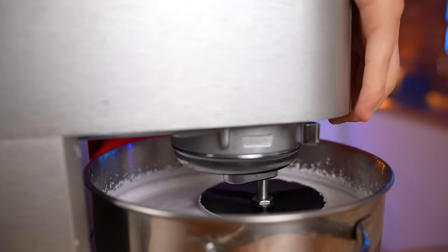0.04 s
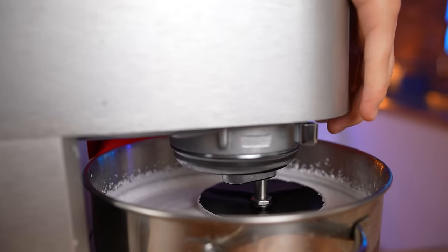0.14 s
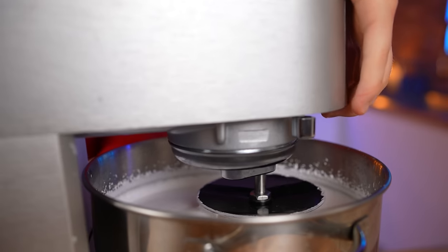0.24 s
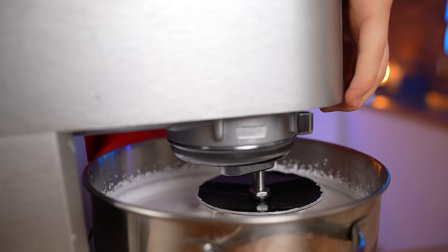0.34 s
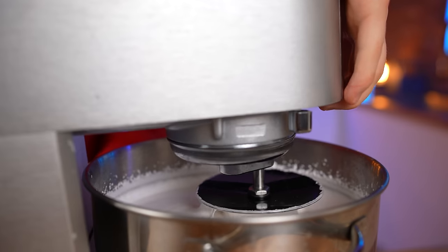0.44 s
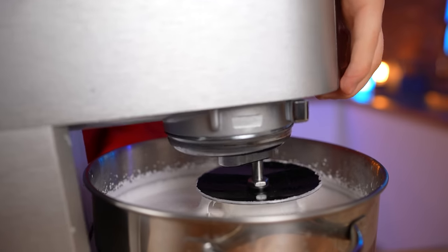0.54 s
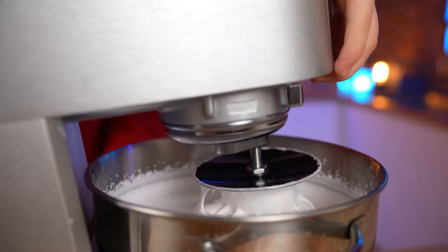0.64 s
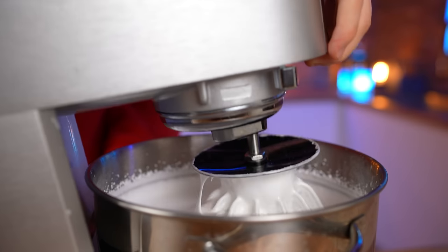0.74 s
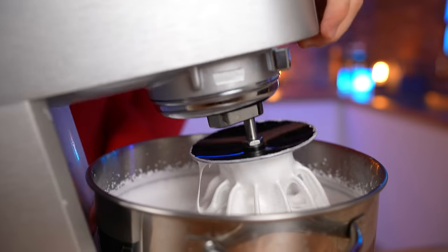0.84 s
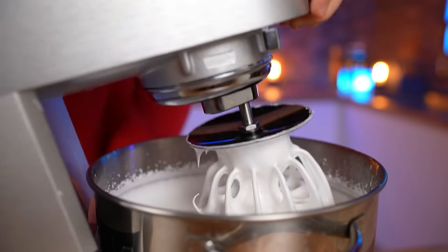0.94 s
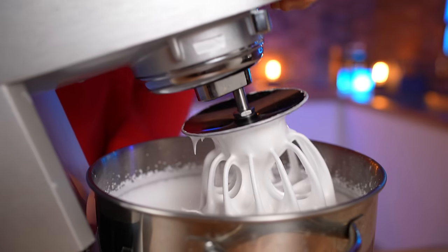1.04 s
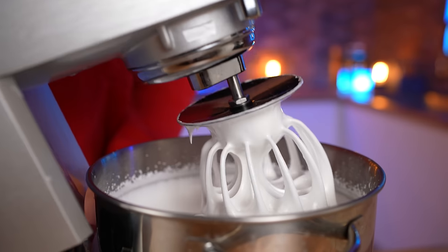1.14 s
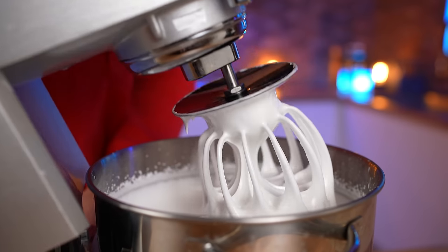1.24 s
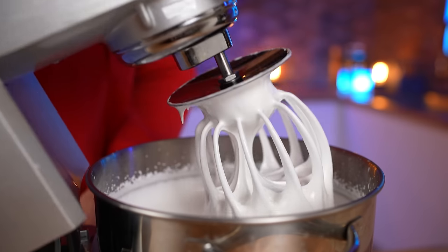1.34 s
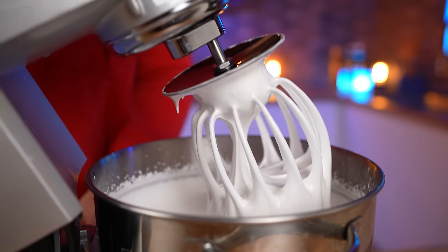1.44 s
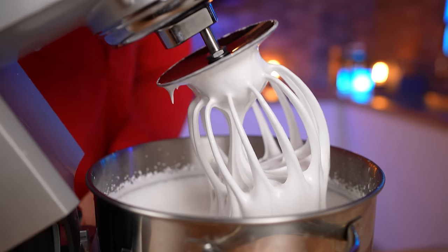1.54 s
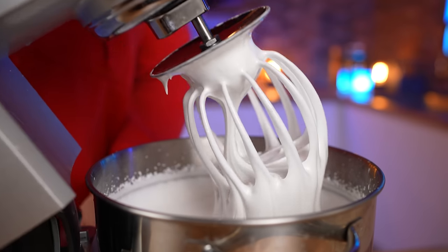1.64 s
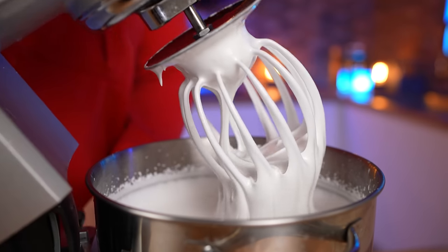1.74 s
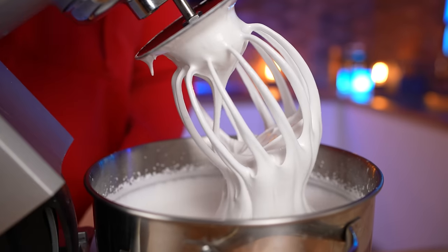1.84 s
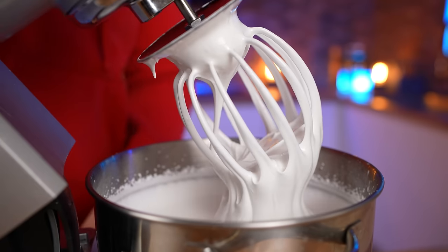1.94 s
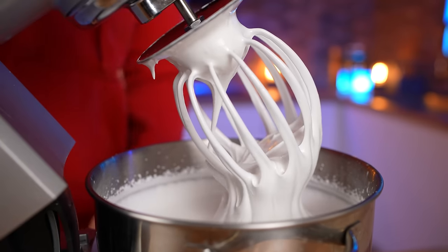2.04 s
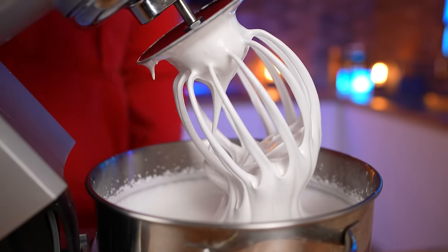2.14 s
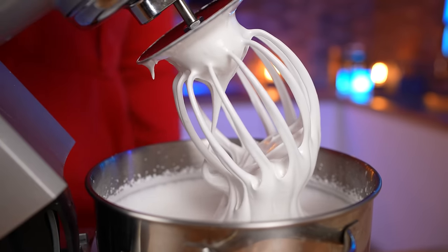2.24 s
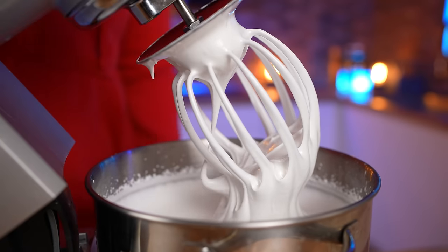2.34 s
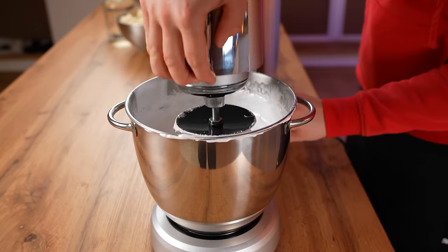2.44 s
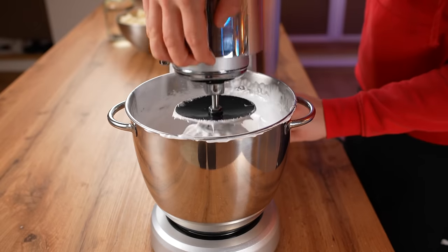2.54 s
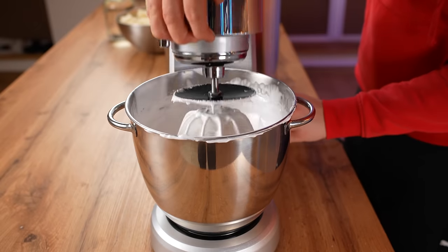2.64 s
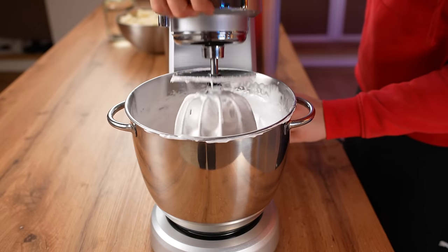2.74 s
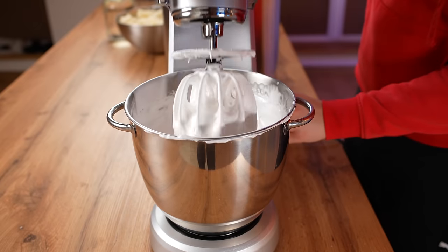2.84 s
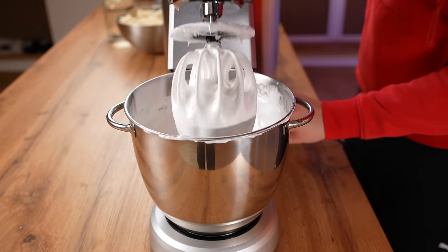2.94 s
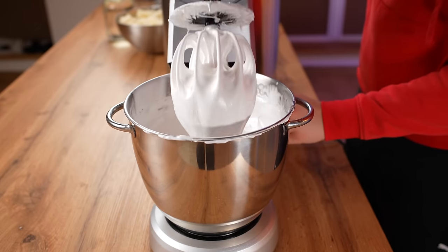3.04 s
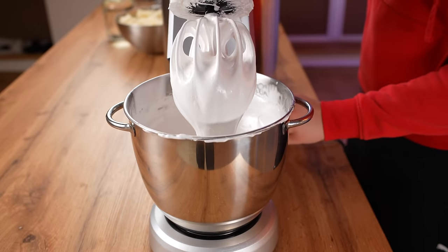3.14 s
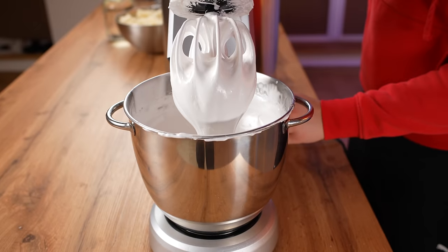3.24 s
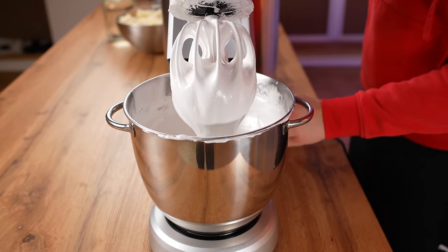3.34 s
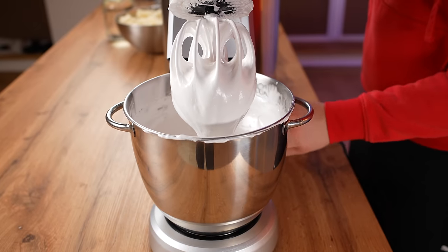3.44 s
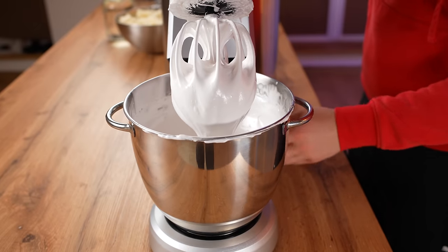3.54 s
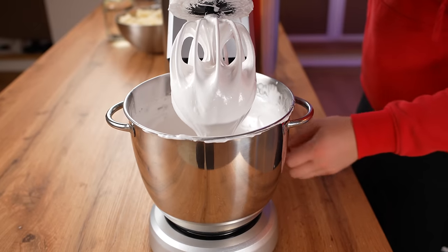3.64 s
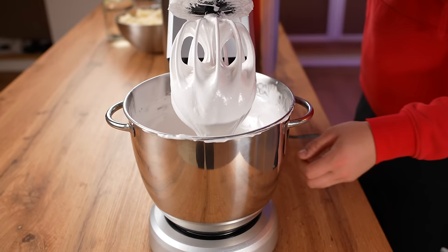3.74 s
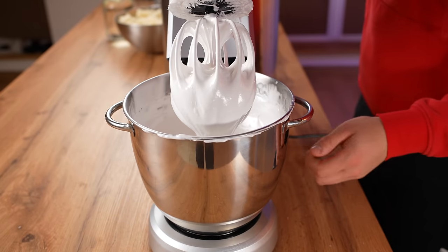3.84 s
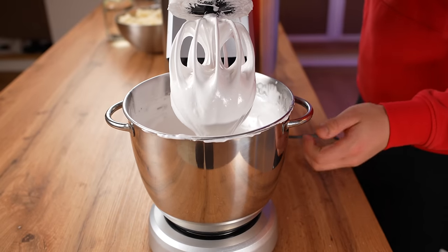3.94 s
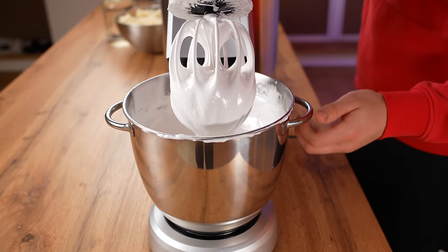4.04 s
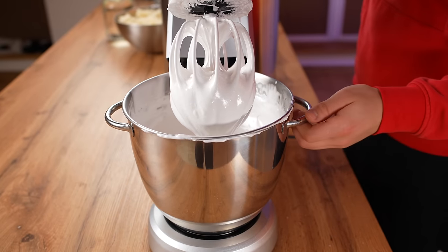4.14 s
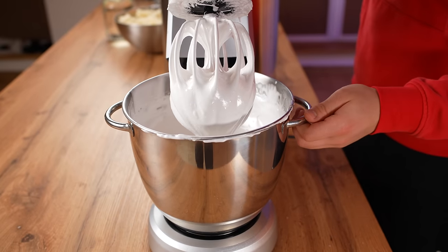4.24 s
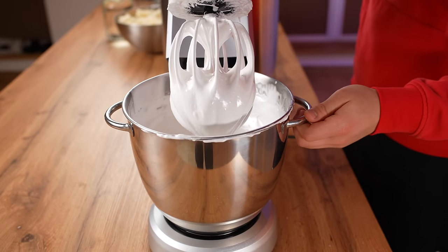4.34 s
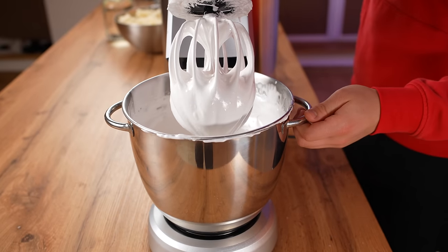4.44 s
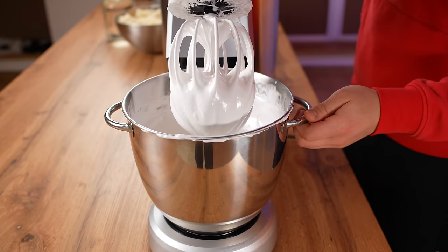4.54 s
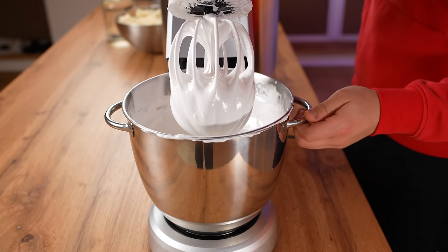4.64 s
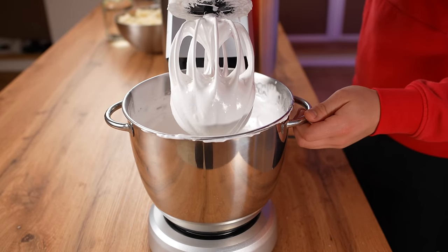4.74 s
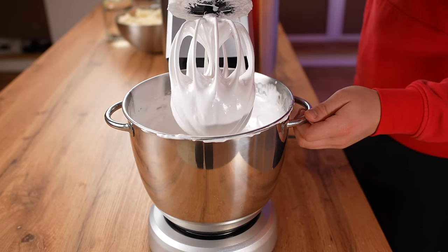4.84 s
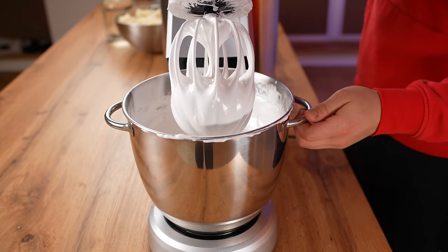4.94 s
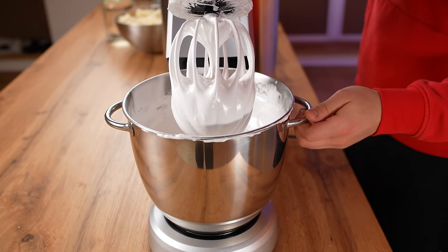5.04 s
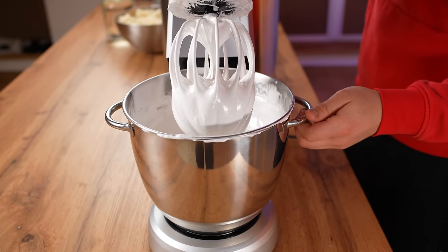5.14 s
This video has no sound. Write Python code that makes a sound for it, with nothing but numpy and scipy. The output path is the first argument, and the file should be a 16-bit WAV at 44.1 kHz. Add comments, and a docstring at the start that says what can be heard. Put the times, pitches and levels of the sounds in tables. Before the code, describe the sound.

Two lifts of a switched-off stand mixer head. The first is close-miked and leans left: bright latch snap, smooth hinge rub, sparse ticks, loud clack at the stop. The second is centred and roomier, with more background air: duller unlatching, uneven scraping with short squeaks, clustered heavy metal knocks, then a deep thud through the wooden counter and a fading room tail.

```python
"""In a kitchen, a stand mixer is handled on a wooden counter with its motor off. At the near place, left of
centre, the latch snaps and the head tilts up on a rubbing, ticking hinge and clacks against its stop. Then,
farther off and centred, the latch snaps again, the head scrapes down and clatters into its lock, and the
machine rocks on its feet with its steel bowl. Bursts of noise ring metal bodies for the contacts, dense tiny
slips make the rubs, wavering tones the judder and squeaks, and decaying noise the room."""
import sys
import numpy as np
from scipy import signal
from scipy.fft import rfft, irfft
from scipy.io import wavfile
from scipy.ndimage import uniform_filter1d

SR = 44100
rng = np.random.default_rng(int(sys.argv[2]) if len(sys.argv) > 2 else 0)


def transcribe(u):
    """Save the signal u as a 16-bit wav file named by the first command-line argument.

    u: samples, shape (n,) or (channels, n), limited to [-1, 1]; the rate is SR.
    q: integer samples, one column per channel.
    """
    v = np.clip(np.atleast_2d(u).T, -1, 1)
    q = np.round(v * 32767).astype(np.int16)
    wavfile.write(sys.argv[1], SR, q)


N = 228129
TIME = np.arange(N) / SR
TAPS = 8192  # length of a body's ringing, in samples
HZ = np.fft.rfftfreq(TAPS, 1 / SR)
FAR_FROM_S = 2.419  # from here on the mixer is heard from the far place
EDGE_HZ = 15950  # upper band limit of the microphone signal
ATTACK_S = .025  # a rubbing stroke takes hold in this time
SHAKE_DB, SHAKE_T60_S = -24, .8  # trembling of the head after a contact: level against it, decay

# Still kitchen at each place, colour before levelling: pitch_hz, colour_db
STILL_NEAR_COLOUR = [(24, -13), (45, -0.5), (170, -17.5), (325, -15), (490, -18.5), (800, -26.5),
                     (1500, -37), (2400, -40), (4000, -36), (5500, -43.5), (15500, -45)]
STILL_FAR_COLOUR = [(29, -37), (50, -3.5), (59, -15.5), (103, -9.5), (119, -25), (148, -12.5), (184, -16),
                    (397, -14), (583, -19.5), (707, -18), (1390, -34.5), (1850, -34.5), (3820, -39.5),
                    (4200, -40), (15800, -39.5)]
STILL_NEAR_DB, STILL_FAR_DB = -58, -50.5
# Deep rumble of the counter and the handling, before its trim: start_s, level_db
RUMBLE_LEVEL = [(0.0, -48), (1.24, -55), (1.81, -46), (1.87, -32), (2.12, -56), (2.38, -58), (2.45, -36),
                (2.72, -40), (2.81, -27), (3.11, -42), (3.28, -25), (3.95, -50), (4.02, -29), (4.12, -45),
                (4.52, -48), (4.61, -35), (5.11, -47), (5.17, -38)]

# Rubbing strokes, each a push that lets go: start_s, end_s, level_db, change_db over the stroke, release_t60_s
LEVER_PRESS = (-.03, .135, -38.3, -.5, .13)  # the release lever, already moving
NEAR_LIFT = (.44, 1.8, -44.7, .5, .3)
FAR_LOWER = (2.48, 3.1, -32.3, -2.3, .2)
LOCK_SETTLE = (3.335, 3.4, -26, -3, .42)  # the head settles in its lock
# Broad colours of the rubs: pitch_hz, colour_db
LEVER_COLOUR = [(60, -16), (100, -6), (160, 5), (300, 4), (480, -12), (700, -7), (980, -4.5), (1900, -8.5),
                (2400, -3), (2800, -13), (3400, -9), (4100, -14.5), (5000, -24.5), (8000, -27.5),
                (15000, -45)]
NEAR_LIFT_COLOUR = [(60, -13), (100, -4.5), (150, -4.5), (230, -12), (320, -7.5), (420, -21), (700, -22.5),
                    (1000, -26), (1880, -24.5), (2900, -31), (3750, -30), (4400, -41), (5000, -36),
                    (5800, -47.5), (8000, -46), (15000, -59)]
FAR_LOWER_COLOUR = [(100, -54), (170, -14.5), (221, 2.5), (267, -7.5), (310, 0), (403, -13), (523, -9),
                    (643, -13), (919, -14), (1310, -20), (2220, -14.5), (2780, -19), (3680, -22),
                    (5350, -36), (15000, -43)]
# Resonances that rubbing brings out, lift before wavering: pitch_hz, width_hz, lift_db
RUB_RESONANCES = [(530, 14, 4), (900, 66, 8), (1150, 14, -10), (1400, 200, 6), (1850, 100, 6),
                  (2160, 50, -2), (2450, 60, -3), (3400, 300, -1), (3850, 120, -1), (4700, 200, -11)]
# Early echoes from the bowl, the counter and the wall: delay_s, level_db against the direct sound
NEAR_ECHOES = [(.0019, -8.5), (.0043, -11), (.0071, -19.5), (0.0102, -5.5), (0.0166, -14), (0.0238, -15.5)]

# Small ticks in the lever and the hinge: start_s, level_db, treble_db
TICK_EVENTS = [(.102, -32, -5), (.1315, -51, 24), (.6058, -45, -2), (.9717, -22.5, -5), (1.193, -26, -7.5),
               (1.2335, -33, -12), (1.4524, -24.5, 1.5), (2.868, -35, 21)]
# Broad colour of a tick: pitch_hz, colour_db
TICK_COLOUR = [(100, -16.5), (500, -1.5), (900, -4.5), (1900, 0), (2600, -8.5), (3500, -6), (5000, -12.5),
               (6000, -18), (7200, -15), (8000, -17.5), (8800, -17.5), (10000, -27.5), (16000, -36)]
# What a tick rings with: pitch_hz, width_hz, lift_db
TICK_RESONANCES = [(800, 70, 2), (1455.5, 170, 3.5), (1995, 80, 4), (3000, 44, 2.5), (3600, 190, 7),
                   (4860, 130, 6), (7100, 250, 6), (8620, 350, 4)]

# Snaps of the steel latch: start_s, level_db, chatter_s, room_db (sent to the room, against the snap)
LATCH_SNAPS = [(0.2499, -9, 0.0027, -10), (2.4222, -31, 0.021, 4)]
# Broad colour of the latch: pitch_hz, colour_db
LATCH_COLOUR = [(100, -57), (600, 2), (1400, 1), (2500, -10), (5000, 2.5), (6500, -0.5), (10000, -3.5),
                (12000, -21), (16000, -21.5)]
# What the latch rings with: pitch_hz, width_hz, lift_db
LATCH_RESONANCES = [(4040, 232.7, 20), (3950, 50, 10.5), (4750, 300, -10), (7360, 510, 9), (9360, 87, 12),
                    (10140, 210, 1)]

# Knocks of the head, lock and bowl; the long-chatter row at 1.764 s is the head dragging just before its stop:
# start_s, level_db, corner_hz of the contact, corner_q (sharpness), bass_db, chatter_s
CONTACT_EVENTS = [(.253, -24.5, 8500, 1.3, -27, .0074), (.260, -16, 2400, 1.8, -4, .0078),
                  (.2665, -10.5, 1900, 2.5, -2.5, .0094), (.2762, -19, 230, 2, 2, .0041),
                  (.458, -29.5, 1700, 1, -3, .013), (.484, -28, 2800, 1.4, 5, .0078),
                  (1.741, -20.5, 2000, 1.5, -9, .009), (1.764, -31, 450, 1.5, -3, .08),
                  (1.8092, -13, 1100, .48, -11, .0068), (1.820, -1.5, 6000, .72, -14, .0042),
                  (1.824, -7, 1050, 1.6, -11, .0038), (1.8298, -12.5, 900, .48, -5, .003),
                  (1.921, -31.5, 1200, .6, 5, .0078), (1.945, -26.5, 900, 1, -2, .015),
                  (2.133, -53, 1000, 1.2, 2, .033), (2.421, -23, 2500, .9, 5.5, .0071),
                  (2.429, -20.5, 1700, 1.1, 4, .014), (2.524, -21.5, 3300, 1.4, -16.5, .0055),
                  (2.568, -30, 3000, 1.5, -20, .024), (2.794, -25.5, 2000, 1.9, 6, .016),
                  (2.8177, -19, 1900, 1.5, -5, .011), (2.858, -22.5, 1900, 1.2, 11, .03),
                  (3.074, -26, 1500, 1.2, -11, .0058), (3.099, -17.5, 950, 2.5, -11, .0074),
                  (3.115, -7, 1050, .8, -7, .016), (3.134, -12, 4200, 2.2, -6.5, .0057),
                  (3.1443, -9.5, 2700, 2.5, -11, .0074), (3.1637, -16, 1300, 1.2, -20, .012),
                  (3.2639, -14, 1500, 1.36, 2, .0065), (3.3344, -19, 3400, 3.6, 9, .0059),
                  (3.353, -25.5, 1100, .3, 3, .0041), (3.3798, -14, 1350, .85, .5, .0059),
                  (3.412, -14.5, 3900, .95, -1, .007)]
# Broad colour of a contact on the cast housing: pitch_hz, colour_db
HOUSING_COLOUR = [(30, -8.5), (90, 3), (300, 2), (440, -4), (900, -0.5), (2000, -4), (4000, -2),
                  (5000, -14), (5500, -11.5), (8000, -5), (11000, -5.5), (16000, -8.5)]
# What the cast housing rings with: pitch_hz, width_hz, lift_db
HOUSING_RESONANCES = [(145.3, 25, 1), (225, 21, -0.5), (320, 63, 1.5), (531, 28, 2.5), (792, 40, -8),
                      (894.4, 25, -3.5), (985, 30, -10.5), (1160, 30, -11.5), (1460, 35, 5),
                      (1620, 30, -9.5), (1854, 51, 5.5), (2237, 35, 4), (2400, 16, 0.5), (3016, 56, 3),
                      (3450, 200, -11), (4930, 300, 9), (10400, 670, -2.5)]

# Decay of the room: pitch_hz, t60_s
ROOM_DECAY = [(60, .65), (250, 0.72), (1000, 0.43), (2500, 0.42), (4500, .41), (8000, .37), (15000, 0.12)]
# Colour of the room before levelling: pitch_hz, colour_db
ROOM_TONE = [(60, 1.5), (130, -5.5), (300, 0), (600, 3), (1000, 4.5), (1700, -4), (2700, -2.5),
             (4200, -0.5), (6000, -4.5), (9000, -4), (15000, -6.5)]

# Stick-slip judder of the hinge as the head is lifted, then lowered, before its trim: start_s, level_db
NEAR_JUDDER_LEVEL = [(0.44, -49), (0.458, -39), (0.742, -48), (1.102, -33), (1.258, -40), (1.306, -34),
                     (1.484, -46), (1.742, -39), (1.8, -30)]
FAR_JUDDER_LEVEL = [(2.43, -33), (2.498, -33), (2.692, -57), (2.83, -30), (2.864, -39), (2.982, -21),
                    (3.246, -27), (3.264, -18), (3.8, -55)]
# Harmonics of the judder, before levelling: multiple, level_db
NEAR_HARMONICS = [(1, 1), (2, 2.5), (3, -3), (4, -12)]
FAR_HARMONICS = [(1, -5), (2, -18), (3, -19.5), (4, -25)]

# Fuzzy sinking tones; the hinge sings lower as the head tilts, the last row is a faint thin whine in the quiet:
# start_s, end_s, first_hz, last_hz, width_hz, level_db
SINKING_TONES = [(.45, 1.2, 2000, 1750, 200, -55), (1.3, 1.85, 1480, 1250, 190, -48),
                 (1.38, 1.85, 3620, 3450, 260, -55.5), (.85, 1.32, 8350, 7050, 300, -74),
                 (3.9, 5.0, 4330, 4190, 170, -74)]
# Squeaky catches of the hinge: start_s, length_s, pitch_hz, level_db
HINGE_CATCHES = [(2.499, .041, 2354, -34), (2.554, .038, 3450, -35), (2.613, .1, 3520, -38),
                 (2.69, .044, 3830, -33.5), (2.773, .028, 3970, -34.5), (2.794, .08, 1535, -31)]

# The machine bouncing on its feet: start_s, level_db
FOOT_BOUNCES = [(3.2709, 1.5), (3.318, -10.5)]
# What a bounce booms with, before the bounce level: pitch_hz, level_db, t60_s
COUNTER_BOOM = [(44.9, -15.5, 0.69), (74.9, -16.5, 0.59), (118, -8, 0.124), (143, -10, 0.126),
                (212.5, -22, 0.16)]

# Lean of the near place across the two channels: pitch_hz, left_minus_right_db
NEAR_LEAN = [(60, 2.0), (400, 2.1), (1300, 3.0), (15000, 3)]


def amp(db):
    """Decibels to gain."""
    return 10 ** (np.asarray(db) / 20)


def unit(x):
    """Scales to rms 1."""
    return x / np.sqrt(np.mean(abs(x) ** 2) + 1e-20)


def read(points, hz):
    """Joins (pitch_hz, value) points on a log pitch axis."""
    f, value = np.transpose(points)
    return np.interp(np.log(hz + 1), np.log(f + 1), value)


def level(rows):
    """Gain over time from (start_s, level_db) rows, silent outside their span."""
    start_s, level_db = np.transpose(rows)
    inside = (TIME >= start_s[0]) * (TIME <= start_s[-1])
    gain = amp(np.interp(TIME, start_s, level_db)) * inside
    return uniform_filter1d(gain, size=200)


def drift(rate_hz):
    """Smoothed random wander of rms 1; a higher rate wanders faster."""
    knots = np.arange(0, N / SR + 1, 1 / (4 * rate_hz))
    values = np.convolve(rng.standard_normal(len(knots)), np.hanning(5), "same")
    return unit(np.interp(TIME, knots, values))


def add(mix, start_s, sound):
    """Mixes a sound in at its start time, cut at the end of the mix."""
    part = mix[round(start_s * SR):][:len(sound)]
    part += sound[:len(part)]


def decay(t, t60_s):
    """Exponential fall of 60 dB in t60_s."""
    return np.exp(-np.log(1000) * t / t60_s)


def body(colour, resonances=()):
    """Causal frequency response: a broad colour with ringing resonances standing out of it."""
    log_gain = np.log(amp(np.maximum(read(colour, HZ), -100)))
    mirrored = np.r_[log_gain, log_gain[-2:0:-1]]
    broad = np.exp(np.conj(signal.hilbert(mirrored)))[:len(HZ)]  # minimum phase
    ringing = sum(amp(db) / (1 + 2j * (HZ - hz) / width) for hz, width, db in resonances)
    return broad * (1 + ringing)


def through(x, response):
    """Passes a sound through a frequency response whose ringing fades out."""
    fade = np.minimum(1, np.linspace(4, 0, TAPS)) ** 2
    return signal.oaconvolve(x, irfft(response) * fade)[:N]


def strike(response, chatter_s):
    """A contact is a dying chatter, even in all bands, that drives a body."""
    fade = np.exp(-np.arange(TAPS) / SR / max(chatter_s, 1e-4))
    burst = rng.standard_normal(TAPS) * fade
    for _ in range(3):
        flat = irfft(np.exp(1j * np.angle(rfft(burst))))  # same phases, equal strength in every band
        burst = flat * np.minimum(1, 4 * fade)
    chatter = unit(burst) * np.sqrt(np.mean(fade ** 2))
    return through(chatter, unit(response))


def echoed(x):
    """Hard surfaces close by repeat a sound and comb its spectrum."""
    out = x.copy()
    for delay_s, db in NEAR_ECHOES:
        add(out, delay_s, amp(db) * x)
    return out / np.sqrt(1 + sum(amp(db) ** 2 for _, db in NEAR_ECHOES))


def stroke(start_s, end_s, level_db, change_db, release_t60_s):
    """Gain of one push: attack, a hold that slowly gains or loses force, release."""
    progress = np.clip((TIME - start_s) / (end_s - start_s), 0, 1)
    attack = np.clip((TIME - start_s) / ATTACK_S, 0, 1)
    release = decay(np.maximum(TIME - end_s, 0), release_t60_s)
    return attack * amp(level_db + change_db * progress) * release


def rub(push, colour, slips_per_s, spread_db, uneven_db, shift_db=-0.5):
    """Many tiny slips drive the housing; as the contact moves, its resonances swell and fade in turn."""
    slips = rng.standard_normal(N) * (rng.random(N) < slips_per_s / SR)
    slips *= amp(spread_db * np.minimum(rng.exponential(1, N), 3))  # a few slips are much stronger
    drive = through(slips * amp(uneven_db * drift(rate_hz=21)), body(colour))
    sound = drive.copy()
    for hz, width_hz, lift_db in RUB_RESONANCES:
        r = np.exp(-np.pi * abs(width_hz) / SR)
        pole = r * np.exp(2j * np.pi * hz / SR)
        ring = 2 * signal.lfilter([1 - r], [1, -pole], drive).real
        sound += ring * amp(lift_db + shift_db * drift(rate_hz=16))
    return unit(echoed(sound)) * stroke(*push)


def judder(gain, harmonics, hz, wander, flutter_db):
    """A low vibration whose pitch wanders and whose harmonics flutter separately."""
    turns = np.cumsum(hz * (1 + wander * drift(rate_hz=25))) / SR
    wave = np.zeros(N)
    for multiple, db in harmonics:
        tone = np.sin(2 * np.pi * (multiple * turns + rng.random()))
        wave += amp(db + flutter_db * drift(rate_hz=25)) * tone
    return unit(wave) * gain


def still(colour, db):
    """Steady room air and microphone hiss: noise in the colour of the place."""
    return amp(db) * unit(through(rng.standard_normal(N), body(colour)))


def lever_press():
    """The release lever rubs in sparse slips as it is pressed."""
    return rub(LEVER_PRESS, LEVER_COLOUR, slips_per_s=3000, spread_db=1.5, uneven_db=0.5)


def counter_rumble():
    """The counter and the handling rumble on one deep, wandering tone."""
    return judder(amp(-2.5) * level(RUMBLE_LEVEL), [(1, 0)], hz=27, wander=0.13, flutter_db=2.5)


def ticks(chatter_s=0.0022, treble_hz=6000, rebound_db=-4):
    """The lever and hinge let go in small slips, each followed by a duller rebound."""
    out, hinge = np.zeros(N), body(TICK_COLOUR, TICK_RESONANCES)
    dull = hinge / (1 + 1j * HZ / 2500) ** 2
    for start_s, db, treble_db in TICK_EVENTS:
        tilt = body([(treble_hz / 2, 0), (treble_hz, treble_db)])
        add(out, start_s, amp(db) * strike(hinge * tilt, chatter_s))
        add(out, start_s + .004, amp(db + rebound_db) * strike(dull, .006))
    return out


def latch():
    """The sprung catch rings high; returns the direct sound and what it sends into the room."""
    out, send = np.zeros(N), np.zeros(N)
    steel = body(LATCH_COLOUR, LATCH_RESONANCES)
    for start_s, db, chatter_s, room_db in LATCH_SNAPS:
        snap = amp(db) * strike(steel, chatter_s)
        add(out, start_s, snap)
        add(send, start_s, amp(room_db) * snap)
    return out, send


def knocks_and_drag():
    """Metal meets or drags on metal; a softer contact has a lower corner and stirs less treble."""
    out, housing = np.zeros(N), body(HOUSING_COLOUR, HOUSING_RESONANCES)
    for start_s, db, corner_hz, corner_q, bass_db, chatter_s in CONTACT_EVENTS:
        u = 1j * HZ / corner_hz
        contact = 1 / (1 + u / max(corner_q, .2) + u ** 2)
        weight = 1 + (amp(bass_db) - 1) / (1 + 1j * HZ / 400)  # bass below about 400 Hz
        add(out, start_s, amp(db) * strike(housing * contact * weight, chatter_s))
    return out


def kitchen(x, build_s=0.0027):
    """Dense reflections build up and die, the high treble soonest."""
    hz, t, z = signal.stft(rng.standard_normal(SR), SR, nperseg=256)
    z = z * amp(read(ROOM_TONE, hz))[:, None]
    z = z * decay(t, read(ROOM_DECAY, hz)[:, None])
    build = 1 - np.exp(-(np.arange(SR) / SR / build_s) ** 2)
    tail = signal.istft(z, SR, nperseg=256)[1][:SR] * build
    mid_gain = np.sqrt(np.mean(abs(rfft(tail)[300:3000]) ** 2))  # 300 to 3000 Hz
    return signal.oaconvolve(x, tail / mid_gain)[:N]


def near_glide():
    """The greased hinge slides evenly on the first lift, in very dense slips."""
    return rub(NEAR_LIFT, NEAR_LIFT_COLOUR, slips_per_s=20000, spread_db=.5, uneven_db=.7)


def shaken(hits):
    """Gain of the trembling that the energy of the contacts leaves in the head."""
    keep = np.exp(-2 * np.log(1000) / (SHAKE_T60_S * SR))
    return amp(SHAKE_DB) * np.sqrt(signal.lfilter([1 - keep], [1, -keep], hits ** 2))


def near_judder(hits):
    """The hinge sticks and slips on the first lift; contacts set the head trembling at the same pitch."""
    gain = amp(-2) * level(NEAR_JUDDER_LEVEL) + shaken(hits)
    return judder(gain, NEAR_HARMONICS, hz=73.9, wander=.06, flutter_db=3.5)


def whistles(broken_db=2):
    """Fuzzy tones swell and fade while their pitch sinks."""
    out = np.zeros(N)
    for start_s, end_s, first_hz, last_hz, width_hz, db in SINKING_TONES:
        progress = np.clip((TIME - start_s) / (end_s - start_s), 0, 1)
        hz = first_hz + (last_hz - first_hz) * progress
        turn = np.exp(2j * np.pi * np.cumsum(hz) / SR)
        fuzz = (drift(width_hz) + 1j * drift(width_hz)) * amp(broken_db * drift(rate_hz=18))
        out += amp(db) * unit((turn * fuzz).real) * np.sin(np.pi * progress)
    return out


def far_judder():
    """The hinge sticks and slips as the head is lowered, with weaker harmonics."""
    return judder(amp(.3) * level(FAR_JUDDER_LEVEL), FAR_HARMONICS, hz=74.4, wander=0.0348, flutter_db=2)


def far_scrape():
    """The head scrapes down as it is lowered, in sparser, more uneven slips."""
    return rub(FAR_LOWER, FAR_LOWER_COLOUR, slips_per_s=4000, spread_db=2.0, uneven_db=2.7)


def catches(width_hz=260, second_ratio=.62, second_db=-5):
    """The dry hinge briefly rasps on a pair of fuzzy pitches."""
    out = np.zeros(N)
    fuzz = [unit(drift(width_hz) + 1j * drift(width_hz)) for _ in range(2)]
    for start_s, length_s, hz, db in HINGE_CATCHES:
        swell = np.sin(np.pi * np.clip((TIME - start_s) / length_s, 0, 1))
        angle = 2 * np.pi * hz * TIME
        first = fuzz[0] * np.exp(1j * angle)
        second = amp(second_db) * fuzz[1] * np.exp(1j * second_ratio * angle)
        out += amp(db) * swell * unit((first + second).real)
    return echoed(out)


def rocking(rise_s=0.0012):
    """The weight of the head drops onto the feet and the counter booms."""
    out, t = np.zeros(N), np.arange(SR) / SR
    boom = sum(amp(db) * decay(t, t60_s) * np.sin(2 * np.pi * hz * t) for hz, db, t60_s in COUNTER_BOOM)
    for start_s, db in FOOT_BOUNCES:
        add(out, start_s, -amp(db) * boom * (1 - np.exp(-t / rise_s)))
    return out


def lock_settle():
    """The head settles in its lock with a short rub of very unequal slips."""
    return rub(LOCK_SETTLE, FAR_LOWER_COLOUR, slips_per_s=8000, spread_db=5, uneven_db=2)


def scene():
    """One microphone signal, leaning left at the near place and centred at the far one."""
    far = TIME >= FAR_FROM_S
    air = np.where(far, still(STILL_FAR_COLOUR, STILL_FAR_DB), still(STILL_NEAR_COLOUR, STILL_NEAR_DB))
    clicks = ticks()
    snaps, snap_send = latch()
    hits = knocks_and_drag()
    rubs = lever_press() + near_glide() + far_scrape() + lock_settle()
    lows = counter_rumble() + near_judder(hits) + far_judder() + rocking()
    squeaks = whistles() + catches()
    hit_send = hits * np.where(far, amp(-6), amp(-9))  # more room from the far place
    room = kitchen(hit_send + amp(-6.5) * clicks + snap_send)
    mono = hits + clicks + snaps + rubs + lows + squeaks + room + air
    lean = np.sqrt(body(NEAR_LEAN))  # half the difference up on the left, half down on the right
    return np.where(far, mono, [through(mono, lean), through(mono, 1 / lean)])


def record(dry):
    """The loudest peaks overload softly; then the treble ends at the band limit."""
    held = dry / (1 + abs(dry) ** 6) ** (1 / 6)
    low_pass = signal.firwin(511, EDGE_HZ, window=("kaiser", 9), fs=SR)
    return signal.oaconvolve(held, low_pass[None], "same")


dry = scene()
out = record(dry)
transcribe(out)
```